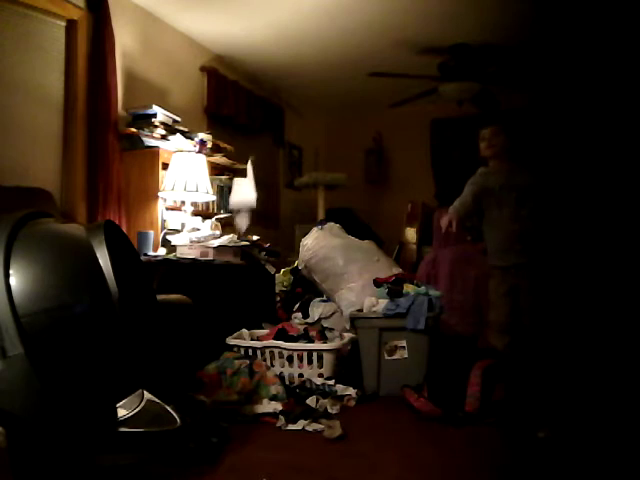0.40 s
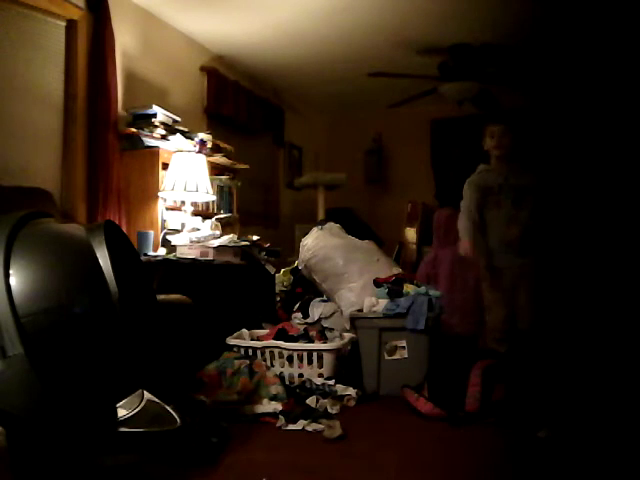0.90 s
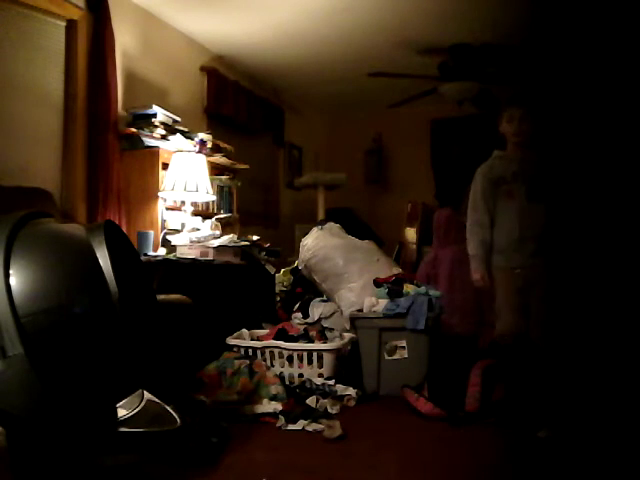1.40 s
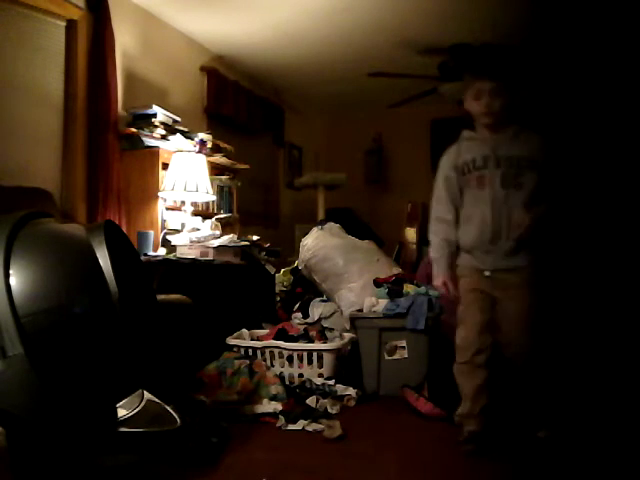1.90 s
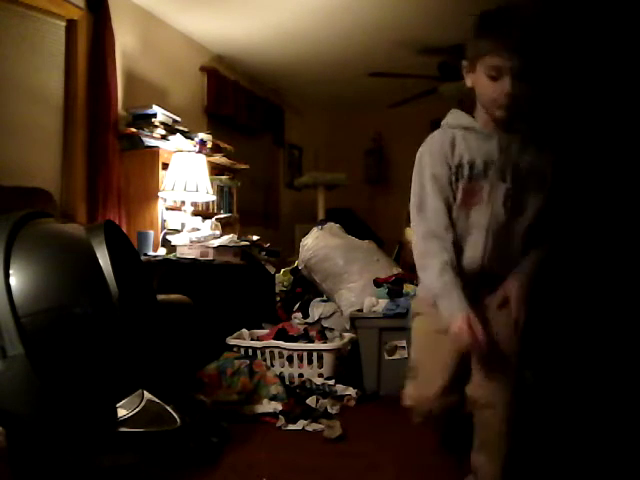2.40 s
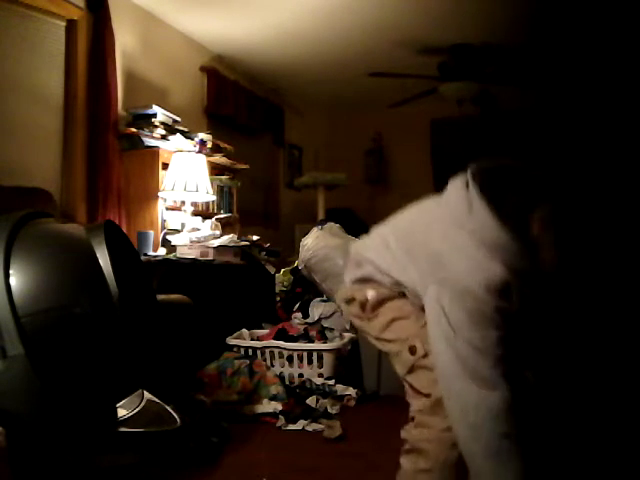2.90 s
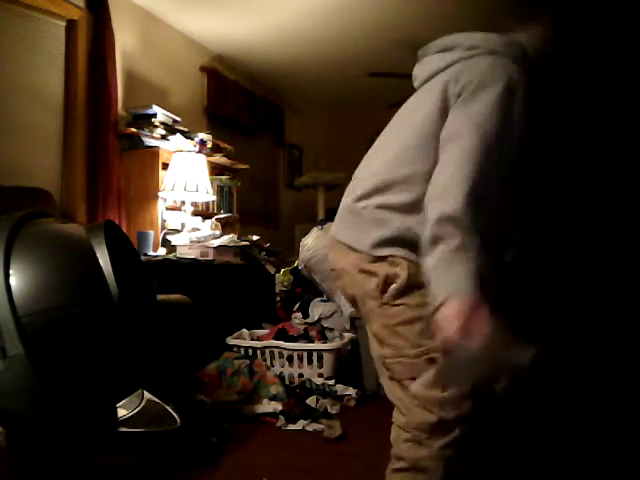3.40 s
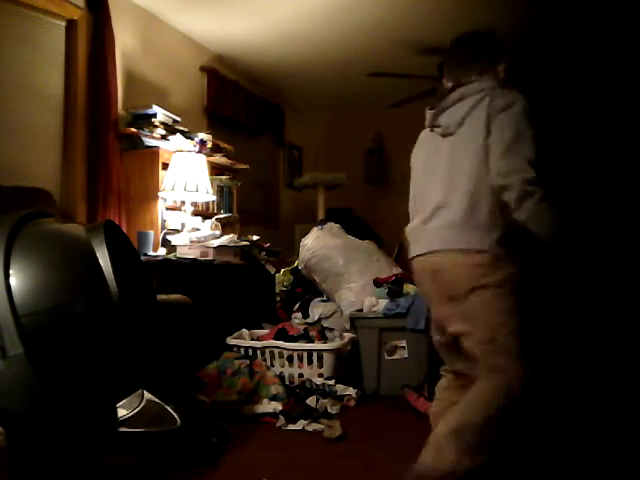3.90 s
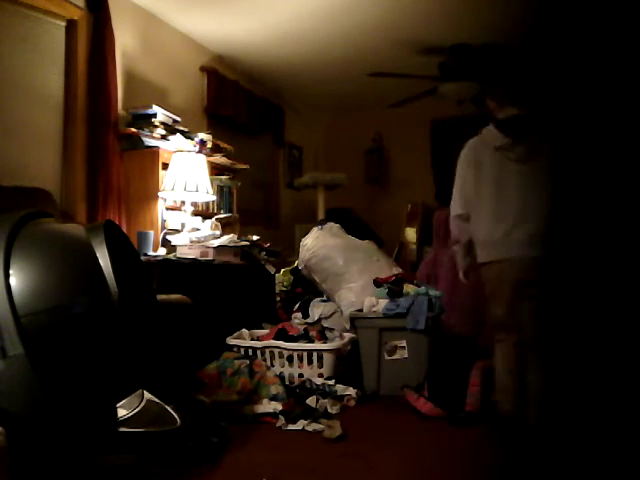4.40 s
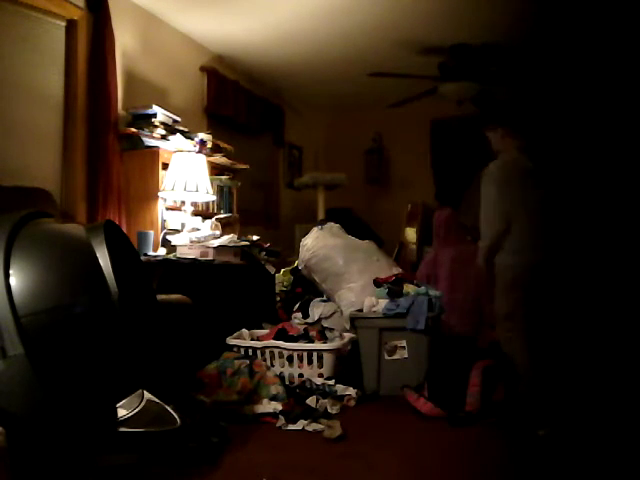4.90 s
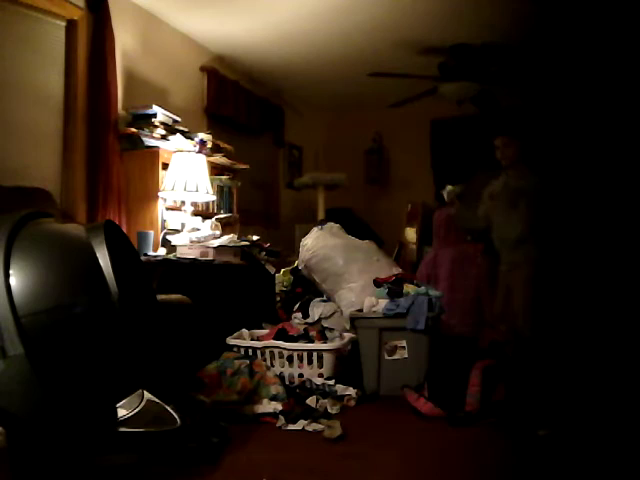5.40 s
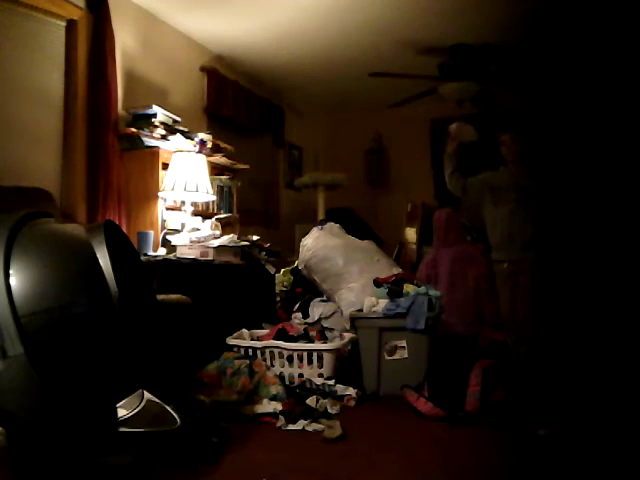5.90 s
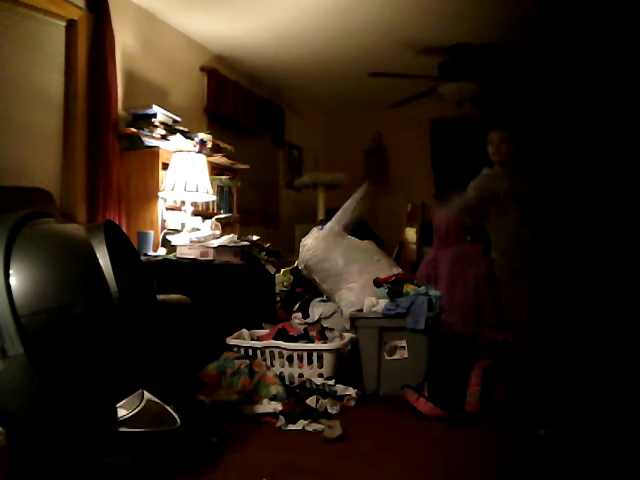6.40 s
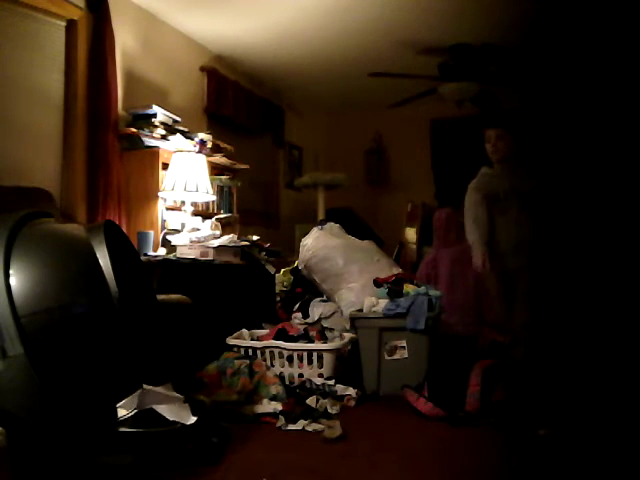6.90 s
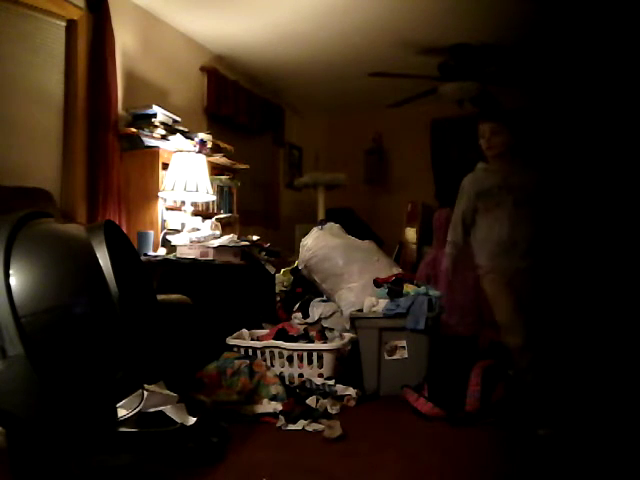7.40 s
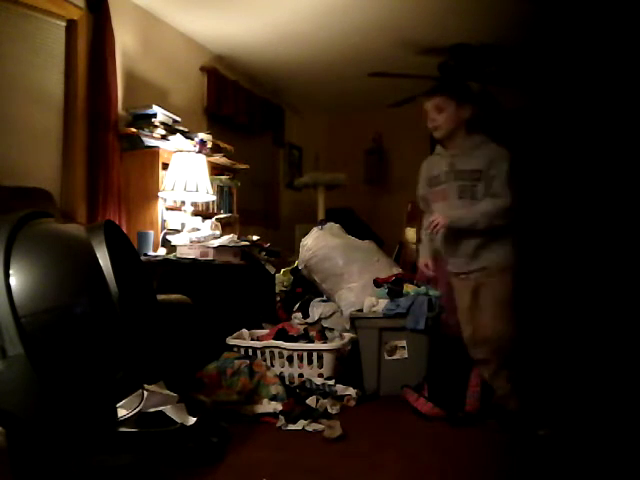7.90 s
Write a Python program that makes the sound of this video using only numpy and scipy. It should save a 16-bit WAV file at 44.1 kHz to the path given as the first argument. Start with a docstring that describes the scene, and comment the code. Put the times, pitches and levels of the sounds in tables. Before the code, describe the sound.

Faint steady hiss over low house rumble, almost nothing else until about 0.65 s, when a thrown paper toy hits with a loud hollow knock, followed by tiny bounces and dry scuffs to 1.15 s. Around 1.3 and 1.5 s come light taps, a soft footfall and a cloth swish. At 2.3 s a heavy heel thud booms in the hollow floor with a bright snap; clothes rustle, and paper ticks near 3.0 s as the toy is picked up. Thuds return at 3.3 s, with a very loud sharp crack at 3.54 s and another step at 3.75 s. Softer treads and scuffs fade by 5 s, with a faint paper rub at 5.5 s. After quiet, a swish at 6.35 s leads to a loud, bright, rattling landing at 6.5 s, dying by 6.9 s. Faint rustles and a soft step close at 7.6 to 7.9 s, in a short, close room.

```python
"""A faint hiss over low rumble is heard first; then a paper toy, thrown by a child across a cluttered carpeted
room, clatters and bounces, heels thud into a hollow wooden floor, clothes rustle and the toy is picked up.
Knocks are showers of contacts ringing a hollow body; footfalls are a gliding boom plus ringing board modes.
Cloth is filtered fibre ticks and snaps are short rings. Airborne sounds gain sparse reflections and pass
a small camera microphone; floor sounds bypass its response, and hiss and rumble are added at the end."""
import sys
import numpy as np
from scipy import signal
from scipy.io import wavfile
from scipy.ndimage import uniform_filter1d

SR = 44100
rng = np.random.default_rng(int(sys.argv[2]) if len(sys.argv) > 2 else 0)


def inscribe(sig):
    """Save sig as 16-bit PCM at rate SR to the path in sys.argv[1].

    A 1-D sig is mono; a 2-D sig holds one channel per row.
    Samples are clipped to [-1, 1] before scaling.
    """
    pcm = np.round(np.clip(np.atleast_2d(sig).T, -1, 1) * 32767)
    wavfile.write(sys.argv[1], SR, pcm.astype(np.int16))


def magnitude_from_level(level_db):
    """Linear magnitude for a level in decibels (20 dB per decade)."""
    exponent = np.asarray(level_db, float) / 20
    return 10 ** exponent


N = 353682  # length in samples


def evened(x):
    """Normalisation by energy: scales to rms 1."""
    return x / np.sqrt(np.mean(x ** 2) + 1e-20)


def peaked(x):
    """Normalisation by amplitude: scales to peak 1."""
    return x / np.max(abs(x))


def read(points, hz):
    """Interpolation along log frequency, in which spectra are customarily drawn."""
    table_hz, value = np.transpose(points)
    return np.interp(np.log(hz + 1), np.log(table_hz + 1), value)


def add(mix, start_s, sound):
    """Superposition: adds a sound to the mix from its start time on."""
    part = mix[round(start_s * SR):][:len(sound)]
    part += sound[:len(part)]


def causal(db_of_hz):
    """Minimum phase: the Hilbert transform of log gain gives the phase of a causal impulse response."""
    hz = abs(np.fft.fftfreq(4096, 1 / SR))
    log_gain = np.log(magnitude_from_level(np.maximum(db_of_hz(hz), -100)))
    spectrum = np.exp(np.conj(signal.hilbert(log_gain)))
    return np.fft.ifft(spectrum).real[:2048]


def coloured(x, curve):
    """Linear filtering: convolves a sound with the causal response of a table of (hz, db)."""
    return signal.oaconvolve(x, causal(lambda hz: read(curve, hz)))[:N]


def ring(modes, detune, seconds):
    """Modal superposition: the impulse response is a sum of exponentially decaying sines."""
    t = np.arange(round(seconds * SR)) / SR
    out = np.zeros(len(t))
    for (hz, db, t60_s), factor in zip(modes, detune):
        out += magnitude_from_level(db - 60 * t / t60_s) * np.sin(2 * np.pi * hz * factor * t)
    return out


def patchy(x, depth_db):
    """Random spectral modulation: gain drifts in patches about 700 Hz wide and 40 ms long."""
    z = signal.stft(x, nperseg=256)[2]
    patches = uniform_filter1d(rng.standard_normal(z.T.shape), size=14, axis=0)
    patches = evened(uniform_filter1d(patches, size=4, axis=1))
    return signal.istft(z * magnitude_from_level(depth_db * patches.T), nperseg=256)[1][:N]


# spectral density of the background, relative: (pitch_hz [Hz], density_db [dB per Hz])
HUSH_SPECTRUM = [(20, -32), (45, 1.5), (110, 7), (220, 6), (500, -4.5), (1000, -8.5), (2000, -14.5),
                 (3500, -17), (6300, -26), (7200, -19.5), (7900, -27), (15800, -28.5)]
HUSH_DB = -63.5  # overall rms level


def hush():
    """Stationary noise shaped in spectrum: house rumble and preamplifier hiss, drifting a little in patches."""
    frames, hz = N // 256 + 5, np.fft.rfftfreq(1024, 1 / SR)
    real, imaginary, patches = rng.standard_normal((frames, 513, 3)).T
    patches = uniform_filter1d(patches, 10, 0)  # along frequency
    patches = evened(uniform_filter1d(patches, 14, 1))  # along time
    drift_db = 1.0 * patches
    z = (real + 1j * imaginary) * magnitude_from_level(read(HUSH_SPECTRUM, hz)[:, None] + drift_db)
    noise = signal.istft(z, nperseg=1024, noverlap=768)[1][:N]
    return magnitude_from_level(HUSH_DB) * evened(noise)


# spectrum of the low swish of cloth: (pitch_hz [Hz], gain_db [dB])
SWISH = [(150, -49.5), (400, -1.5), (1000, -7.5), (2000, -18), (4000, -40.5)]
# spectrum of the bright rub of cloth: (pitch_hz [Hz], gain_db [dB])
RUB = [(500, -19.5), (1500, -5.5), (3500, -1.5), (7000, -1.5), (14000, -0.5)]
# clothes rustling as the child moves, joined by straight lines in dB: (time_s [s], level_db [dB])
RUSTLE = [(0, -78), (.13, -55.5), (.25, -79), (1.24, -66.5), (1.299, -44.5), (1.48, -59.5), (1.9, -64),
          (2.28, -59.5), (2.42, -51.5), (2.75, -57.5), (2.9, -54), (3.122, -64.5), (3.359, -55.5),
          (3.75, -50.5), (3.98, -62), (4.203, -54.5), (4.4, -61), (4.88, -57.5), (5.049, -62), (6.27, -77),
          (6.36, -50), (6.55, -65), (7.2, -62), (7.52, -66), (7.619, -55), (7.74, -61), (7.851, -55),
          (8.02, -63)]
# short scuffs of cloth and paper: (start_s [s], length_s [s], level_db [dB])
SCUFFS = [(0.79, 0.037, -38), (0.853, 0.014, -40.5), (0.953, 0.033, -55), (0.99, 0.056, -44.5),
          (1.051, 0.044, -46), (1.11, 0.038, -50.5), (1.142, 0.047, -55.5), (1.495, 0.084, -49),
          (2.62, 0.028, -49.5), (2.777, 0.055, -47.5), (2.973, 0.038, -41), (3.145, 0.17, -53.5),
          (3.519, 0.013, -51), (3.835, 0.067, -51.5), (4.043, 0.04, -50), (4.177, 0.042, -62),
          (4.897, 0.028, -58), (5.458, 0.093, -54.5), (5.507, 0.14, -54.5), (6.325, 0.035, -56.5)]
RUSTLE_SWISH_DB, SCUFF_SWISH_DB = -2, -8  # swish against rub


def cloth():
    """Friction noise: dense fibre ticks in clumps give a running rustle and scuffs that swell and fade."""
    rustle = magnitude_from_level(np.interp(np.arange(N) / SR, *np.transpose(RUSTLE)))
    scuffs = np.zeros(N)
    for start_s, length_s, level_db in SCUFFS:
        u = np.linspace(0, 1, round(length_s * SR))
        swell = np.sin(np.pi * u ** .7) ** .9  # quicker in than out
        add(scuffs, start_s, magnitude_from_level(level_db) * swell)

    slow = uniform_filter1d(uniform_filter1d(rng.standard_normal(N), 300), 300)
    clumps = magnitude_from_level(1.4 * evened(slow))
    tick_db = 3.2 * np.minimum(rng.exponential(1, (2, N)), 6)  # a few ticks stand out
    ticks = clumps * rng.standard_normal((2, N)) * magnitude_from_level(tick_db)

    rub = evened(patchy(coloured(ticks[0], RUB), 2.5))
    swish = evened(patchy(coloured(ticks[1], SWISH), 2.2))
    swish_level = magnitude_from_level(RUSTLE_SWISH_DB) * rustle + magnitude_from_level(SCUFF_SWISH_DB) * scuffs
    return (rustle + scuffs) * rub + swish_level * swish


# small bright snaps of stiff paper and plastic: (start_s [s], level_db [dB, start of the ring], pitch_hz [Hz])
SNAPS = [(2.3218, -16, 6330), (2.902, -34.5, 3760), (3.0048, -23.5, 5500), (3.4708, -28.5, 5900),
         (3.636, -20.5, 6060), (3.644, -31, 5800), (3.752, -29, 6400), (4.9075, -29, 6200),
         (4.9146, -35, 4330), (5.1532, -38.5, 4350)]
SNAP_CYCLES, SNAP_CLICK_DB = 16, -5  # t60 in cycles of the pitch; click against the ring


def snaps():
    """Impulsive excitation of one mode: a single click and a very short high ring."""
    out = np.zeros(N)
    for start_s, level_db, pitch_hz in SNAPS:
        snap = ring([(pitch_hz, 0, SNAP_CYCLES / pitch_hz)], [1], .02)
        snap[0] = magnitude_from_level(SNAP_CLICK_DB)
        add(out, start_s, magnitude_from_level(level_db) * snap)
    return out


# modes of the floor boards: (ratio [multiple of their pitch], level_db [dB], share [fraction of the t60])
BOARDS = [(.6, -5, 1.2), (.76, -7.5, 0.98), (1, 2, 0.6), (1.14, -4, 0.72), (1.55, -22, .3),
          (1.94, -11, 0.2)]


def boards(level_db, pitch_hz, t60_s, tilt_db=0):
    """Modal response: the boards knock as a weight comes on, their modes slightly detuned at each knock."""
    t = np.arange(round(.6 * SR)) / SR
    detune = 1 + .025 * rng.standard_normal(len(BOARDS))
    modes = []
    for ratio, mode_db, share in BOARDS:
        tilted_db = mode_db + tilt_db * np.log2(ratio)  # tilt in dB per octave
        modes.append((ratio * pitch_hz, tilted_db, share * t60_s))
    onset = 1 - np.exp(-(t / 0.0044) ** 2)
    return magnitude_from_level(level_db) * peaked(ring(modes, detune, .6) * onset)


# boom of the joists, one row: final_hz [Hz], extra_hz [Hz more at first], glide_s [s], length_s [s],
# roundness [exponent of the swell]
BOOM = (48, 40, .025, 0.145, 0.35)
BOOM_FADE_DB_PER_S = 70
SHUDDER_DB = -21  # the whole floor shudders on after the boom


def boom():
    """Dispersion: the joists swell into a boom that sinks in pitch, as slow bending waves come last."""
    t = np.arange(round(.6 * SR)) / SR
    final_hz, extra_hz, glide_s, length_s, roundness = BOOM
    turns = final_hz * t + extra_hz * glide_s * (1 - np.exp(-t / glide_s))
    swell = abs(np.sin(np.pi * np.minimum(t / length_s, 1) ** .6)) ** roundness
    first = swell * magnitude_from_level(-BOOM_FADE_DB_PER_S * t)
    shudder = magnitude_from_level(SHUDDER_DB - 60 * t / 0.8) * (1 - np.exp(-(t / 0.084) ** 2))
    return -(first + shudder) * np.sin(2 * np.pi * turns)


# light things landing on the boards:
# (start_s [s], knock_db [dB], pitch_hz [Hz, boards], boom_db [dB, joists against the knock])
DROPS = [(0.652, -24, 215, -32), (1.488, -49, 213, -33), (2.975, -45.5, 230, -36), (6.514, -20.5, 237, -45),
         (6.66, -39.5, 232, -41)]
DROP_T60_S, DROP_TILT_DB = 0.15, 5  # tilt per octave: light things favour the higher board modes


def drops():
    """Light impact: a small mass mostly excites the boards and hardly the joists."""
    out, joists = np.zeros(N), boom()
    for start_s, knock_db, pitch_hz, boom_db in DROPS:
        knock = boards(knock_db, pitch_hz, DROP_T60_S, DROP_TILT_DB)
        add(out, start_s, knock + magnitude_from_level(knock_db + boom_db) * joists)
    return out


# footfalls: (start_s [s], boom_db [dB, joists], knock_db [dB, boards against the boom], pitch_hz [Hz, boards])
STEPS = [(1.275, -58.5, 17.5, 211.3), (1.767, -55, -4.5, 215), (2.311, -28, 1.5, 251),
         (2.626, -47, -8, 218), (3.331, -34.5, 9.5, 215), (3.54, -30, 9, 225), (3.745, -42, 1.5, 221.6),
         (4.218, -53, 4.5, 214), (4.596, -56.5, 7, 208), (7.577, -58, -3, 209)]
STAMP_T60_S, TREAD_T60_S = 0.055, 0.95  # limits for hard and soft footfalls
TREAD_DB = -48  # knock level midway between stamp and tread


def steps():
    """Heavy impact: each footfall excites joists and boards; a soft tread rolls on and keeps them sounding."""
    out, joists = np.zeros(N), boom()
    for start_s, boom_db, knock_db, pitch_hz in STEPS:
        board_db = boom_db + knock_db
        softness = 1 / (1 + magnitude_from_level(board_db - TREAD_DB))
        t60_s = STAMP_T60_S + (TREAD_T60_S - STAMP_T60_S) * softness
        add(out, start_s, magnitude_from_level(boom_db) * joists + boards(board_db, pitch_hz, t60_s))
    return out


# modes of a struck body: (ratio [multiple of its pitch], level_db [dB], t60 [cycles of the pitch])
BODY = [(0.548, -10.5, 14), (1, 0, 12.6), (1.401, -7.5, 7.6), (1.899, -15, 12), (2.4, -19, 18)]
# knocks of the toy, heels and clutter: (start_s [s], level_db [dB, rms of the first 5 ms],
# pitch_hz [Hz, body], crack_db [dB, against the body], t60_s [s, clatter, at least 0.005])
KNOCKS = [(0.654, -12.5, 592, -9, 0.077), (0.686, -24.5, 903, -3.5, 0.047), (0.697, -27, 560, -23, .05),
          (0.756, -27.5, 1007, -1.5, 0.067), (0.809, -36.5, 1160, -1, 0.023), (1.266, -35, 1010, 8, 0.13),
          (1.279, -41, 526, -19, 0.092), (1.486, -36, 1030, 4, 0.045), (2.182, -47, 920, -21, 0.071),
          (2.31, -37.5, 996, -10, 0.012), (2.319, -26, 402, -29, 0.029), (2.323, -28.5, 430, 9, .02),
          (2.972, -47, 543, 6, 0.055), (3.006, -33, 910, 7.5, 0.027), (3.335, -41.5, 1220, 1, 0.042),
          (3.471, -47, 1290, 14, 0.025), (3.537, -9, 1790, 7, 0.11), (3.619, -29, 1210, -1, 0.11),
          (3.972, -44.5, 608, -12, .04), (4.046, -48.5, 950, -3, 0.045), (4.248, -37.5, 1040, -1, 0.025),
          (4.879, -47, 970, -1.5, 0.042), (6.281, -46.5, 1085, -13, 0.028), (6.379, -44, 1070, -6, 0.077),
          (6.514, -10.5, 1020, 8.5, .17), (6.523, -13.5, 1810, 5.5, 0.19), (6.568, -21.5, 954, 0.5, 0.17),
          (6.657, -29, 625, -26, 0.042), (6.718, -43, 925, -9, 0.25), (6.809, -46.5, 572, -13, 0.041),
          (7.836, -46, 1186, -11.5, 0.044)]
FIRST_CONTACT, LUMPY_DB = 1.7, 2.2  # size against a small contact; unevenness of the shower
BODY_DRIVE_T60_S = .12  # later contacts rattle but hardly swing the body


def knocks():
    """Impact excitation: a first contact and a lumpy, dying shower of others ring a damped hollow body."""
    t, out = np.arange(SR // 3) / SR, np.zeros(N)
    head = slice(220)  # first 5 ms, where levels are set
    for start_s, level_db, pitch_hz, crack_db, t60_s in KNOCKS:
        chance, size, turn, lump = rng.random((4, len(t)))
        happens = chance < 5000 / SR  # 5000 contacts per second on average
        contacts = happens * np.sign(turn - .5) * magnitude_from_level(-3.5 * np.log(np.maximum(size, .06)))
        contacts *= magnitude_from_level(LUMPY_DB * evened(uniform_filter1d(lump - .5, 150)))
        contacts[0] = FIRST_CONTACT
        contacts *= magnitude_from_level(-60 * t / max(t60_s, .005))

        dull = np.clip(.3 - 0.029 * crack_db, .1, .85)  # soft blows last longer and lose treble
        crack = signal.lfilter([1], [1, -2 * dull, dull ** 2], contacts)

        modes = [(pitch_hz * ratio, mode_db, cycles / pitch_hz) for ratio, mode_db, cycles in BODY]
        drive = contacts * magnitude_from_level(-60 * t / BODY_DRIVE_T60_S)
        body = signal.oaconvolve(drive, ring(modes, np.ones(len(BODY)), .05))[:len(t)]
        body *= 1 - np.exp(-t / 0.001)  # the body takes a moment to swing

        struck = body / np.std(body[head]) + magnitude_from_level(crack_db) * crack / np.std(crack[head])
        add(out, start_s, magnitude_from_level(level_db) * struck / np.std(struck[head]))
    return out


# reverberation of the room: (pitch_hz [Hz], t60_s [s])
ROOM = [(100, 0.63), (400, 0.2), (1500, 0.25), (4000, 0.28), (8000, 0.15), (14000, 0.031)]


def room(x):
    """Reverberation: sparse reflections of random sign, each band dying at its own speed."""
    taps = np.zeros(SR // 2)
    at = np.arange(200, len(taps) - 20, 20)
    taps[at + rng.integers(0, 20, len(at))] = rng.choice([-1., 1.], len(at))
    hz, t, z = signal.stft(taps, SR, nperseg=256)
    decay = magnitude_from_level(-60 * t / read(ROOM, hz)[:, None])
    tail = signal.istft(z * decay, SR, nperseg=256)[1]
    return signal.oaconvolve(x, tail / np.linalg.norm(tail))[:N]


# response of the microphone: (pitch_hz [Hz], gain_db [dB])
MICROPHONE = [(60, -41), (150, -19), (250, -16), (420, -9), (900, -3.5), (1300, -4.5), (1700, -3),
              (2150, -1), (2600, -6.5), (3100, -2.5), (3500, -2.5), (4000, -6.5), (4800, -8), (6300, -7),
              (7600, -18), (11000, -31), (15800, -52)]


def microphone(x):
    """Transducer response: a small microphone weakens bass and high treble."""
    return coloured(x, MICROPHONE)


def scene():
    """Transmission paths: airborne sounds fill the room and pass the microphone; the floor is added directly."""
    near = cloth() + snaps() + knocks()
    air = microphone(near + magnitude_from_level(-12) * room(near))
    floor = drops() + steps()
    # the boom hardly reaches the air
    radiated = signal.sosfilt(signal.butter(2, 110, "highpass", fs=SR, output="sos"), floor)
    bass_cut = signal.butter(3, 38, "highpass", fs=SR, output="sos")
    events = signal.sosfilt(bass_cut, air + floor + magnitude_from_level(-10.5) * room(radiated))
    return (events + hush())[None]


def band_limit(x):
    """A steep low-pass at the top of the band."""
    return signal.sosfilt(signal.butter(12, 16440, fs=SR, output="sos"), x)


def record(dry):
    """Direct-current offset: the converter shifts the whole waveform slightly."""
    mix = dry - .0005
    return band_limit(mix)


dry = scene()
out = record(dry)
inscribe(out)
```